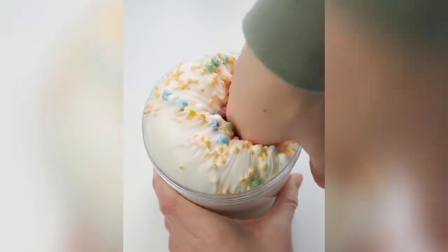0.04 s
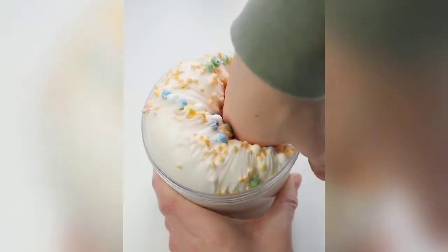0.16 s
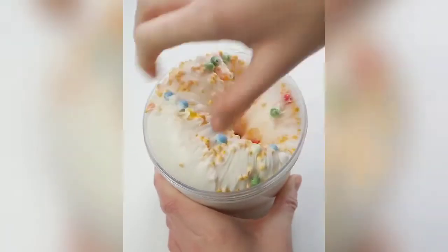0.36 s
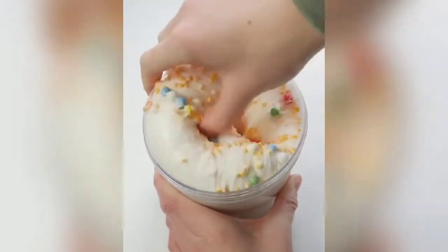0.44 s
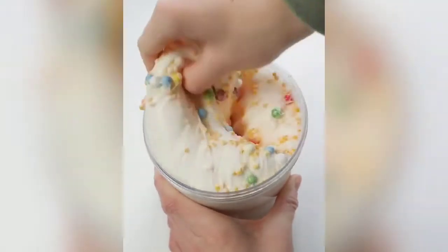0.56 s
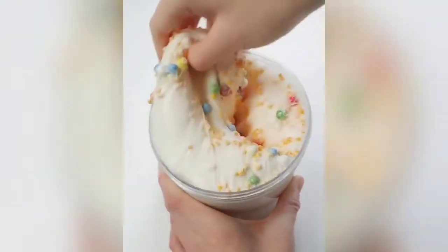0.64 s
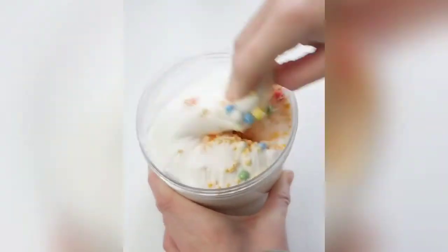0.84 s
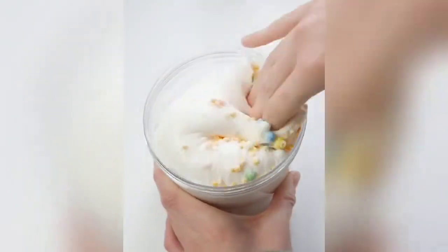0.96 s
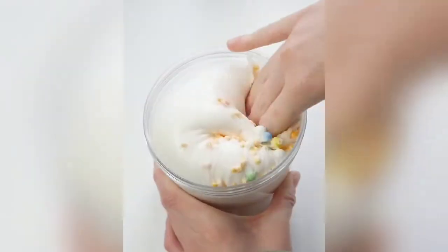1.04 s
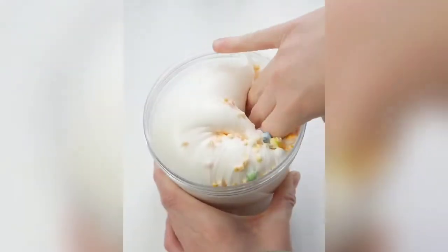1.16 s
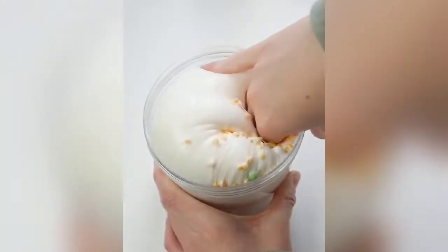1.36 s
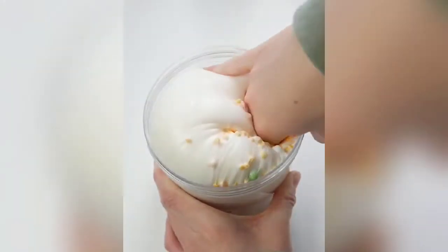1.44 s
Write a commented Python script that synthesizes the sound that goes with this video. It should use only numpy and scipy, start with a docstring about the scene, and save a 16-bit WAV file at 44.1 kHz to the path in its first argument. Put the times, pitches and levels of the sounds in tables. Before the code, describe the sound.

Thick beaded slime being kneaded in a plastic tub, crackling, popping and groaning wetly up close

```python
"""First a faint crackle and a sharp snap over quiet room tone and a low hum: a hand digs into a plastic tub
of thick slime with foam beads, close to the microphone, pulls a lump up and presses it back.
Trapped air fizzes out as coloured bursts and noise spurts; pockets pop as short, rising sines;
blisters around the beads snap as decaying sines with a noise crack. Dragged slime sticks and slips:
uneven pulses ring the tub's resonances into a groan. A small room reflects it all."""
import sys
import numpy as np
from scipy import signal
from scipy.fft import rfft, irfft
from scipy.io import wavfile
from scipy.ndimage import uniform_filter1d, map_coordinates

SR = 44100
rng = np.random.default_rng(int(sys.argv[2]) if len(sys.argv) > 2 else 0)


def persist_wave(psi):
    """Save psi, clipped to +-1, as 16-bit WAV."""
    counts = np.round(np.clip(psi, -1, 1) * 32767).astype(np.int16)
    wavfile.write(sys.argv[1], SR, np.atleast_2d(counts).T)


N = 66150
T = np.arange(N) / SR  # [s]

# Room tone spectrum: (frequency [Hz], level [dB])
AIR_SPECTRUM = [(25, -9), (60, 0), (100, -9.5), (150, 4), (230, 0.5), (280, -4), (350, 7), (430, 9.5),
                (520, 3), (650, 6), (1200, 0), (2500, -2.5), (7000, -14.5), (16000, -37)]
# Low hum: (time [s], level [dB])
HUM_LEVEL = [(0, -71), (1.5, -63.5)]
# Fine crackle under the kneading: (time [s], level [dB])
CRACKLE_LEVEL = [(0, -60), (.05, -63), (.1, -71.5), (.2, -68), (.35, -67.5), (.43, -67.5), (.53, -56.5),
                 (.58, -67), (.68, -67), (.8, -57.5), (.9, -61.5), (1.05, -57.5), (1.2, -66), (1.33, -62.5),
                 (1.44, -67), (1.5, -63.5)]
# Air squeezed out past the fingers: (time [s], level [dB])
FIZZ_LEVEL = [(.17, -65), (.214, -53), (.226, -44), (.24, -47), (.255, -42), (.275, -45), (.288, -49.5),
              (.297, -43), (.307, -54), (.32, -98)]
# Fizz spectrum: (frequency [Hz], level [dB])
FIZZ_SPECTRUM = [(60, -16.5), (170, 3.5), (290, 8.5), (500, -1.5), (700, 12.5), (1000, 5.5), (1400, -0.5),
                 (2400, -2), (3100, -4), (3900, 5), (5000, -6), (7000, 3.5), (8500, -5), (13000, -4.5),
                 (16000, -17)]
# Spurts of air through the slime: (peak time [s], Gaussian length [s], level [dB], pitch [Hz])
AIR_SPURTS = [(0.2233, 0.00089, -33.5, 3850), (0.2487, 0.0008, -37, 3400), (0.257, 0.0022, -51, 7200),
              (0.271, 0.0014, -46.5, 6430), (.294, 0.0018, -52, 12400), (0.295, 0.0013, -43.5, 2500),
              (0.7206, 0.002, -34, 3200), (0.7898, 0.0013, -44.5, 6500), (.79, 0.00089, -42.5, 3500),
              (0.7902, 0.0017, -46, 9600), (0.908, 0.0026, -43.5, 7000), (0.909, 0.0012, -42, 3150),
              (1.2198, 0.00072, -41.5, 9940), (1.2215, 0.0013, -42.5, 7000)]
# Popping air pockets: (time [s], level [dB], starting pitch [Hz], decay [s])
POCKET_POPS = [(.137, -54, 566, 0.018), (.2283, -21, 666, 0.0036), (0.225, -51, 50, 0.004),
               (.301, -24.5, 2200, 0.0012), (.303, -48, 2280, 0.0084), (.407, -39, 274.4, 0.0061),
               (.405, -39.5, 836, 0.0028), (.414, -44.5, 664, 0.0084), (.4435, -23.5, 805, 0.0011),
               (.447, -54, 178, 0.0091), (.522, -40.5, 895, 0.0026), (.642, -40.5, 296, 0.024),
               (.7425, -42, 756, .0022), (1.2205, -35.5, 846, 0.0024), (1.227, -37, 620, 0.0027),
               (1.229, -41.5, 258, 0.0054), (1.232, -53.5, 144.5, 0.013)]
# Tub resonances: (frequency [Hz], width [Hz], level [dB])
TUB_MODES = [(202, 38, -7), (286, 60, -4.5), (427, 76, 0), (605, 33, 10), (681.4, 38, 6), (768, 52, 7),
             (814.6, 25, 6), (962, 79, 1), (1420, 120, -2), (1510, 55, -12)]
# Peeling film resonances, each applied twice: (frequency [Hz], width per pass [Hz], level [dB])
FILM_MODES = [(1930, 550, -5), (2323, 240, 6.5), (2705, 270, 5.5), (3310, 430, 1), (4270, 1300, -9.5)]
# Pulls along the tub: (time of full force [s], hold [s], start of letting go [s],
# groan level [dB], rasp level [dB], wet hiss level [dB], slime pitch at full force [Hz])
SLIME_PULLS = [(0.631, 0.0034, 0.68, -34, -51.5, -61, 712), (0.716, 0.02, 0.799, -32.5, -43.5, -48, 770),
               (0.846, 0.036, 0.915, -44, -56.5, -86, 576)]
# Snapping blisters, plus at 0.2278 s a sharp spurt of escaping air rung the same way: (time [s], level [dB],
# pitch [Hz], width [Hz])
BLISTER_SNAPS = [(.0149, -38, 12500, 2100), (0.1824, -35, 7100, 2270), (0.2278, -21, 4030, 740),
                 (.2281, -24.5, 2500, 600), (0.3929, -32.5, 13700, 2600), (.4047, -30, 13700, 2000),
                 (.418, -15, 12900, 4300), (0.4428, -25.5, 2310, 1560), (0.444, -36, 7100, 1400),
                 (0.4726, -28.5, 14000, 3000), (0.4884, -27, 12400, 3300), (0.4984, -28.5, 12500, 3000),
                 (0.5034, -23.5, 8900, 2290), (0.5213, -22.5, 6980, 840), (0.5213, -20.5, 12200, 3050),
                 (0.5493, -33.5, 12000, 2400), (0.5899, -27.5, 12300, 1180), (0.6088, -36, 4260, 2580),
                 (0.6512, -30.5, 11300, 4740), (.8241, -31.5, 14000, 3020), (0.9, -39, 6800, 980),
                 (0.9175, -31.5, 6600, 920), (.941, -24, 6160, 1090), (0.941, -26, 4180, 885),
                 (0.9918, -29.5, 6550, 450), (1.025, -17, 9200, 5100), (1.025, -31, 4430, 1900),
                 (1.0789, -35, 4200, 1370), (1.1038, -30.5, 6250, 1400), (1.1487, -38.5, 7240, 2280),
                 (1.1805, -38.5, 3740, 1490), (1.1848, -34, 4400, 1800), (1.2298, -26, 9600, 3400),
                 (1.2305, -35, 3520, 1500), (1.2602, -38.5, 10100, 3400), (1.4795, -35, 7100, 3660),
                 (1.496, -40.5, 7200, 1200)]

AIR_DB, AIR_SIDE_DB = -59.5, 2.5  # side level relative to mid
HUM_HZ, HUM_WIDTH_HZ = 272.3, 13.6

FLICKER_DB, FLICKER_HZ = 2, 95  # greatest swing either way, upper rate
CRACKLE_PER_S, CRACKLE_SCATTER_DB = 3000, 4.5
BLISTER_HZ, BLISTER_SPREAD_OCTAVES, BLISTER_DECAY_CYCLES = 9780, 0.67, 1.4
BLISTER_LOW_HZ = 3570
SQUISH_DB, SQUISH_HZ, SQUISH_WIDTH_HZ = -8, 655, 200

FIZZ_PER_S, FIZZ_SCATTER_DB = 5400, 2
SPURT_WIDTH_HZ, SPURT_HISS_DB, SPURT_LOW_HZ = 960, -4.5, 1950

POP_RISE_S, POP_GLIDE_RATIO, POP_ROUGH_RAD = 0.00076, 0.052, 0.26

SLIP_HZ, SLIP_JITTER, GRIT_DECAY_S = 418.9, 0.6, 0.004  # SLIP_HZ: from the median gap, before the glide
SLIME_DB, SLIME_WIDTH_HZ = -1.5, 88
TUB_LOW_HZ, TUB_TOP_HZ, HISS_TOP_HZ = 140, 1640, 9400
GROAN_GLIDE_PER_S, RASP_GLIDE_PER_S = 0.477, 1.7  # relative pitch rise as the slime stretches
GROAN_RISE_DB_PER_S, GROAN_FALL_DB_PER_S = 1031, 250
RASP_RISE_DB_PER_S, RASP_FALL_DB_PER_S = 856, 379
RELEASE_DB_PER_S = 704

CRACK_DB, CRACK_DECAY_S, SNAP_RISE_S = -15.5, 0.0017, 0.00004  # decay varies by half either way
SNAP_LOW_HZ = 2360

# Reflections: near from tub and hand, then the room; side levels relative to mid
NEAR_DB, NEAR_DECAY_S, NEAR_SIDE_DB = -9, 0.0043, -10
ROOM_DB, ROOM_DECAY_S, ROOM_SIDE_DB = -12, 0.0099, -25
LOW_DB, LOW_DECAY_S, LOW_SIDE_DB = -4.5, 0.014, -8.5
SPLIT_HZ = 1500
RECORDER_TOP_HZ = 16000


def amp(db):
    """Decibels to gain."""
    return 10 ** (np.asarray(db) / 20)


def unit(x):
    """Scale to rms 1."""
    return x / np.sqrt(np.mean(x ** 2) + 1e-20)


def curve(rows):
    """Gain through (time [s], level [dB]) points, dying away outside them."""
    s, db = np.array(rows, float).T
    outside_s = np.abs(T - np.clip(T, s[0], s[-1]))
    return amp(np.interp(T, s, db) - 1000 * outside_s)


def colour(x, points):
    """Minimum-phase filter through (frequency [Hz], level [dB]) points."""
    hz, db = np.array(points, float).T
    log_hz = np.log(np.arange(2049) * SR / 4096 + 1)
    gain = amp(np.interp(log_hz, np.log(hz), db))
    cepstrum = irfft(np.log(gain))
    cepstrum[1:2048] *= 2  # fold onto positive time: causal
    cepstrum[2049:] = 0
    impulse = irfft(np.exp(rfft(cepstrum)))
    return signal.fftconvolve(x, impulse)[:N]


def ring(x, hz, width_hz):
    """One resonance, gain 1 at its centre."""
    return signal.lfilter(*signal.iirpeak(hz, hz / width_hz, fs=SR), x)


def highpass(x, hz):
    """Take away the lows."""
    return signal.sosfilt(signal.butter(2, hz, "high", fs=SR, output="sos"), x)


def lowpass(x, hz):
    """Take away the highs."""
    return signal.sosfilt(signal.butter(2, min(hz, 0.45 * SR), fs=SR, output="sos"), x)


def add(out, s, sound):
    """Mix a sound in at a time."""
    i = max(int(s * SR), 0)
    out[i:i + len(sound)] += sound[:max(N - i, 0)]


def grains(per_s, scatter_db):
    """Random single-sample bursts of either sign, mostly weak and a few strong."""
    size = amp(scatter_db * np.minimum(rng.exponential(size=N), 4.5))
    happens = rng.random(N) < per_s / SR
    return happens * size * rng.choice([-1, 1], N)


def flicker(depth_db, hz):
    """Gain that flickers at random, bounded in dB."""
    return amp(depth_db * np.tanh(unit(lowpass(rng.standard_normal(N), hz))))


def swell(s, hold_s, rise_db_per_s, fall_db_per_s):
    """Gain that rises to 1 at s, holds and falls at steady dB slopes."""
    before_s = np.maximum(s - T, 0)
    after_s = np.maximum(T - s - hold_s, 0)
    return amp(-rise_db_per_s * before_s - fall_db_per_s * after_s)


def glide(x, s, per_s):
    """Raise pitch steadily by time-warping, passing the original pitch at s."""
    read_s = T + per_s * (T - s) ** 2 / 2
    return map_coordinates(x, [read_s * SR], mode="mirror")


def stereo(side_db, size):
    """Two related noises, mid plus and minus side."""
    mid, side = rng.standard_normal((2, size))
    return mid + amp(side_db) * np.array([side, -side])


def room_tone():
    """Steady wide noise shaped by the room tone spectrum."""
    noise = stereo(AIR_SIDE_DB, N)
    return amp(AIR_DB) * unit(np.array([colour(channel, AIR_SPECTRUM) for channel in noise]))


def hum():
    """Noise through one narrow, low resonance."""
    return curve(HUM_LEVEL) * unit(ring(stereo(AIR_SIDE_DB, N), HUM_HZ, HUM_WIDTH_HZ))


def crackle():
    """Many faint blisters ring briefly, each at its own pitch, over a dull squish; the level flickers."""
    out, t = np.zeros(N), T[:SR // 400]
    bursts = grains(CRACKLE_PER_S, CRACKLE_SCATTER_DB)
    octaves = BLISTER_SPREAD_OCTAVES * rng.standard_normal(N)
    pitch_hz = np.clip(BLISTER_HZ * 2 ** octaves, SNAP_LOW_HZ, SR / 2)
    for i in np.flatnonzero(bursts):
        decay = np.exp(-pitch_hz[i] * t / BLISTER_DECAY_CYCLES)
        add(out, T[i], bursts[i] * np.sin(2 * np.pi * pitch_hz[i] * t) * decay)
    blisters = unit(highpass(out, BLISTER_LOW_HZ))
    squish = amp(SQUISH_DB) * unit(ring(rng.standard_normal(N), SQUISH_HZ, SQUISH_WIDTH_HZ))
    mix = blisters + highpass(squish, TUB_LOW_HZ)
    return mix * curve(CRACKLE_LEVEL) * flicker(FLICKER_DB, FLICKER_HZ)


def escaping_air():
    """A fizz of tiny bursts, plus short spurts of whistle and hiss through narrow openings."""
    fizz = unit(colour(grains(FIZZ_PER_S, FIZZ_SCATTER_DB), FIZZ_SPECTRUM))
    out = fizz * curve(FIZZ_LEVEL) * flicker(FLICKER_DB, FLICKER_HZ)
    for s, length_s, db, hz in AIR_SPURTS:
        air = rng.standard_normal(N)
        whistle = unit(ring(ring(air, hz, SPURT_WIDTH_HZ), hz, SPURT_WIDTH_HZ))
        hiss = amp(SPURT_HISS_DB) * highpass(air, SPURT_LOW_HZ)
        envelope = np.exp(-((T - s) / length_s) ** 2 / 2)
        out += amp(db) * envelope * (whistle + hiss)
    return out


def pops():
    """An opened pocket rings unsteadily and dies away, rising slightly in pitch."""
    out, t = np.zeros(N), T[:SR // 8]
    for s, db, hz, decay_s in POCKET_POPS:
        decay = np.exp(-t / decay_s)
        phase = 2 * np.pi * np.cumsum(hz * (1 + POP_GLIDE_RATIO * (1 - decay))) / SR
        wobble = POP_ROUGH_RAD * unit(lowpass(rng.standard_normal(len(t)), hz / 2))
        body = np.sin(phase + wobble) * decay * (1 - np.exp(-t / POP_RISE_S))
        add(out, s, amp(db) * highpass(body, hz / 2))
    return out


def drag():
    """Uneven slips ring tub and stretched slime into a groan; the peeling film rasps upward and hisses."""
    gaps_s = np.exp(SLIP_JITTER * rng.standard_normal(900)) / SLIP_HZ
    at = (np.cumsum(gaps_s) * SR).astype(int)
    slips = np.zeros(N)
    slips[at[at < N]] = 1
    slip_decay = signal.lfilter([1], [1, -np.exp(-1 / (GRIT_DECAY_S * SR))], slips)
    grit = slip_decay * rng.standard_normal(N)

    tub = sum(amp(db) * ring(slips, hz, width) for hz, width, db in TUB_MODES)
    tub = lowpass(highpass(tub, TUB_LOW_HZ), TUB_TOP_HZ)
    rasp = unit(sum(amp(db) * ring(ring(grit, hz, width), hz, width) for hz, width, db in FILM_MODES))
    hiss = unit(lowpass(highpass(grit, TUB_TOP_HZ), HISS_TOP_HZ))

    out = np.zeros(N)
    for s, hold_s, end_s, groan_db, rasp_db, hiss_db, hz in SLIME_PULLS:
        slime = amp(SLIME_DB) * ring(tub, hz, SLIME_WIDTH_HZ)
        groan = glide(tub + slime, s, GROAN_GLIDE_PER_S)
        groan = groan / np.sqrt(uniform_filter1d(groan ** 2, size=500) + 1e-12)  # even out the level
        body = amp(groan_db) * groan * swell(s, hold_s, GROAN_RISE_DB_PER_S, GROAN_FALL_DB_PER_S)
        peel = amp(rasp_db) * glide(rasp, s, RASP_GLIDE_PER_S) + amp(hiss_db) * hiss
        peel = peel * swell(s, hold_s, RASP_RISE_DB_PER_S, RASP_FALL_DB_PER_S)
        out += (body + peel) * amp(-RELEASE_DB_PER_S * np.maximum(T - end_s, 0))
    return out


def snaps():
    """Each blister bursts with a noise crack of its own length and a quickly damped ring."""
    out, t = np.zeros(N), T[:SR // 100]
    for s, db, hz, width_hz in BLISTER_SNAPS:
        envelope = np.exp(-np.pi * width_hz * t) * (1 - np.exp(-t / SNAP_RISE_S))
        tone = envelope / envelope.max() * np.sin(2 * np.pi * hz * t)
        bright = np.diff(rng.standard_normal(len(t)), prepend=0) / 2
        crack = bright + rng.standard_normal(len(t)) / 2
        crack_s = CRACK_DECAY_S * rng.uniform(0.5, 1.5)
        add(out, s, amp(db) * (tone + amp(CRACK_DB) * crack * np.exp(-t / crack_s)))
    return highpass(out, SNAP_LOW_HZ)


def tail(db, decay_s, side_db):
    """A dying two-channel cloud of reflections, as enveloped noise."""
    t = T[:SR // 3]
    envelope = np.exp(-t / decay_s) * (1 - np.exp(-10 * t / decay_s))
    cloud = stereo(side_db, len(t)) * envelope
    return amp(db) * unit(cloud) / np.sqrt(len(t))


def room(x):
    """Treble scatters off tub and hand and fades in the room; the lows linger longer."""
    low = signal.sosfiltfilt(signal.butter(2, SPLIT_HZ, fs=SR, output="sos"), x)
    bright = tail(NEAR_DB, NEAR_DECAY_S, NEAR_SIDE_DB) + tail(ROOM_DB, ROOM_DECAY_S, ROOM_SIDE_DB)
    dull = tail(LOW_DB, LOW_DECAY_S, LOW_SIDE_DB)
    treble_echo = signal.fftconvolve(x - low, bright, axes=1)
    low_echo = signal.fftconvolve(low, dull, axes=1)
    return x + (treble_echo + low_echo)[:, :N]


def scene():
    """Centred slime sounds in the room, over its tone and hum."""
    slime = crackle() + escaping_air() + pops() + drag() + snaps()
    return room_tone() + hum() + room(np.tile(slime, (2, 1)))


def record(dry):
    """The recorder cuts the top with a steep low-pass."""
    return signal.sosfilt(signal.ellip(8, 0.2, 70, RECORDER_TOP_HZ, fs=SR, output="sos"), dry)


dry = scene()
out = record(dry)
persist_wave(out)
```